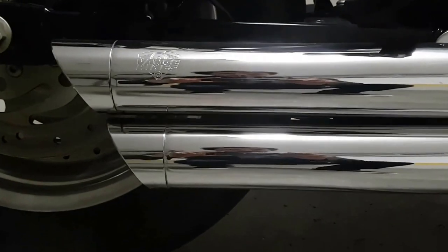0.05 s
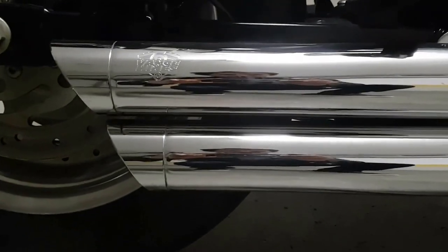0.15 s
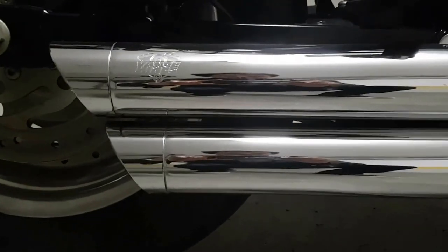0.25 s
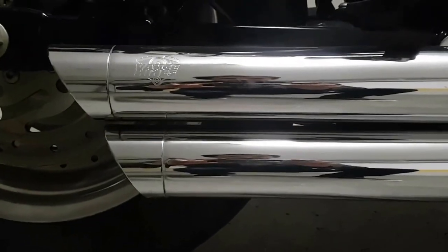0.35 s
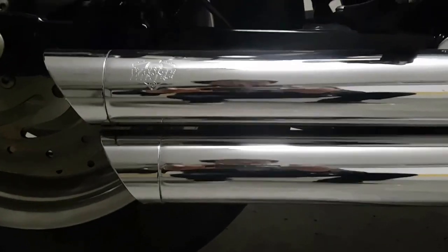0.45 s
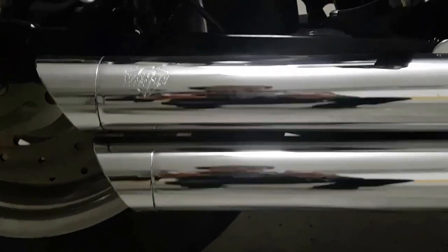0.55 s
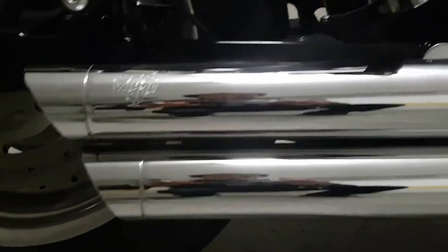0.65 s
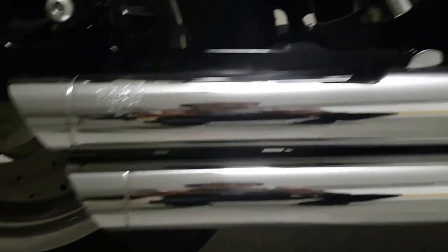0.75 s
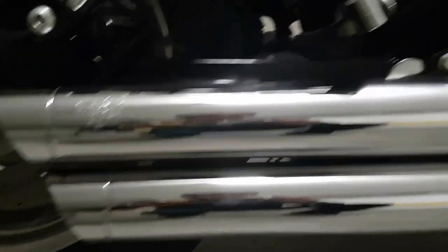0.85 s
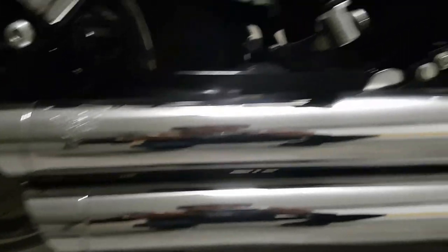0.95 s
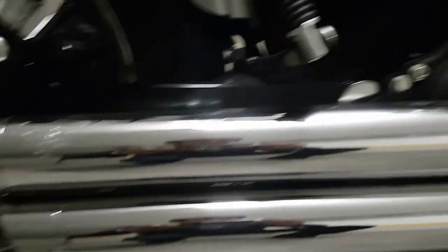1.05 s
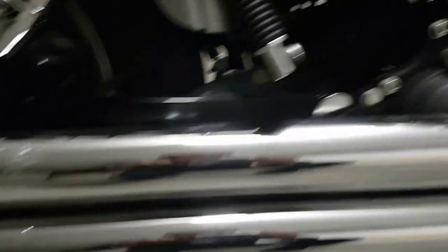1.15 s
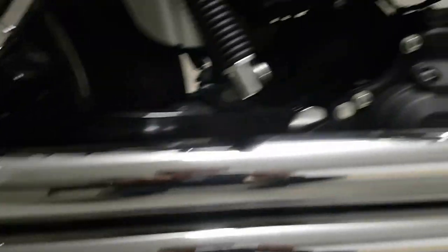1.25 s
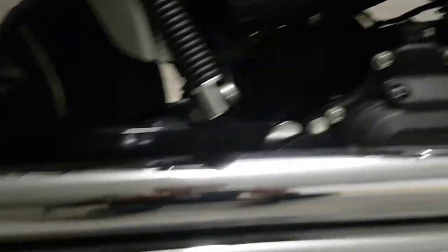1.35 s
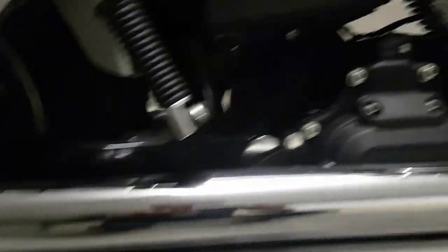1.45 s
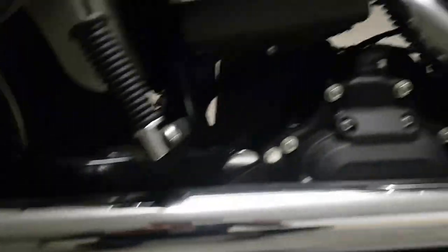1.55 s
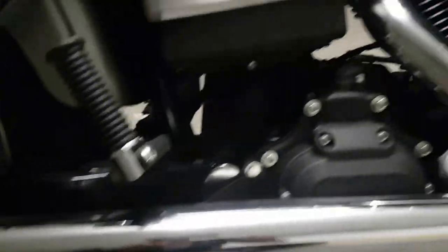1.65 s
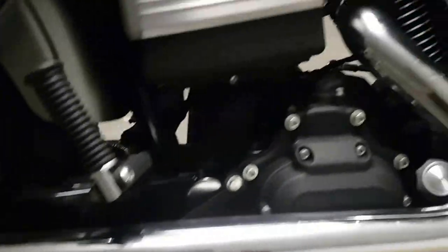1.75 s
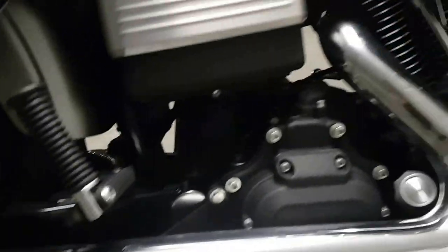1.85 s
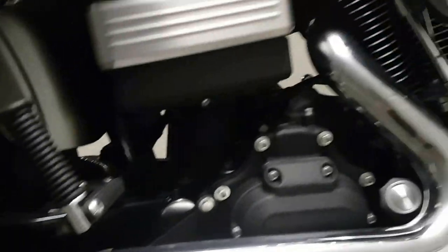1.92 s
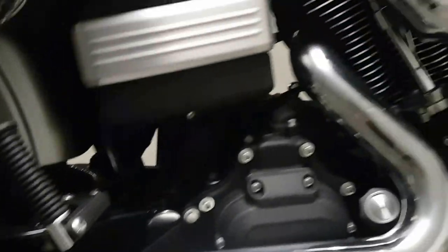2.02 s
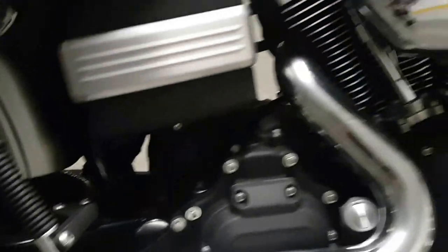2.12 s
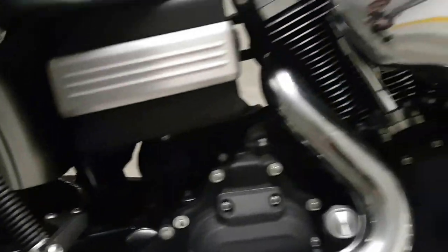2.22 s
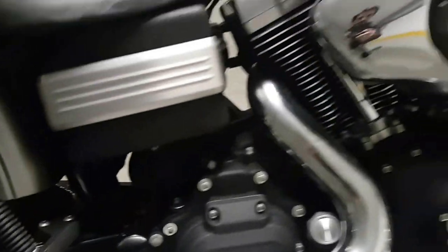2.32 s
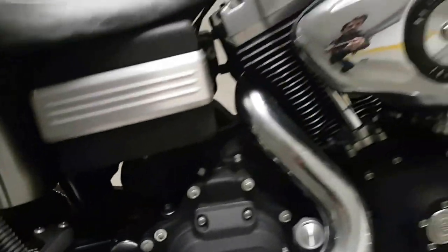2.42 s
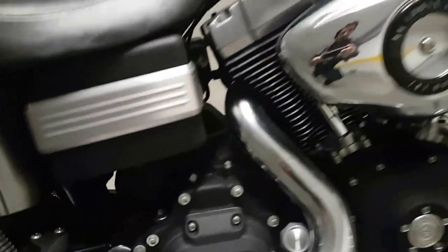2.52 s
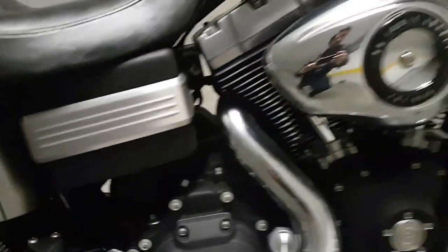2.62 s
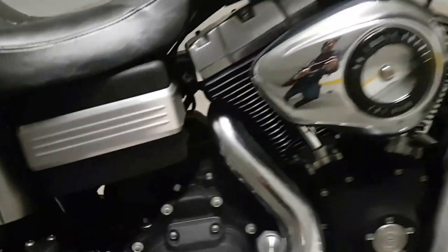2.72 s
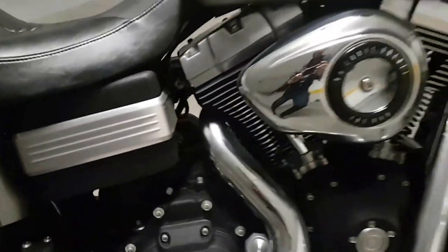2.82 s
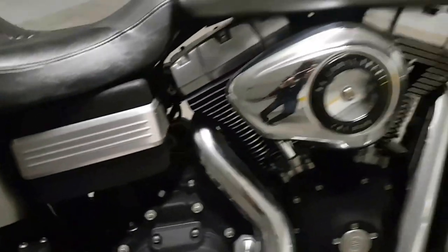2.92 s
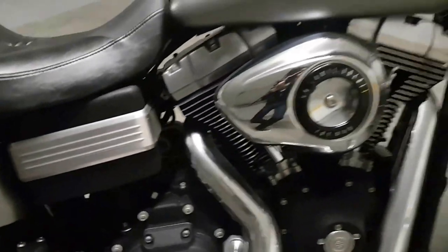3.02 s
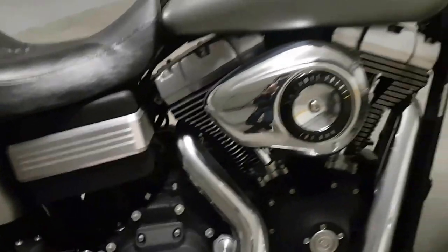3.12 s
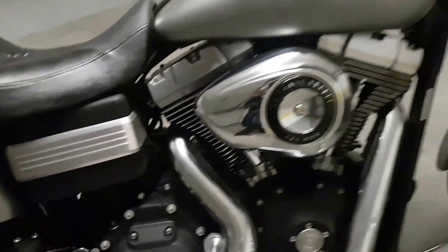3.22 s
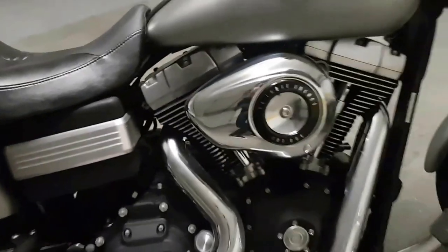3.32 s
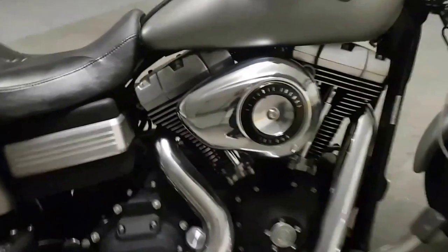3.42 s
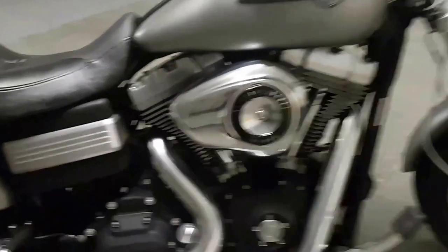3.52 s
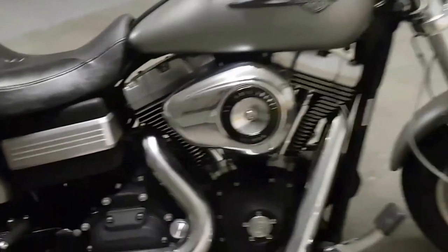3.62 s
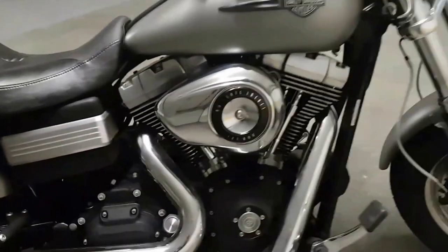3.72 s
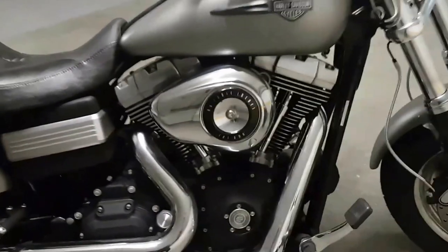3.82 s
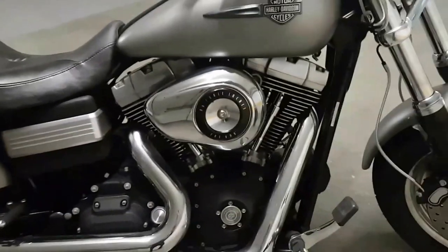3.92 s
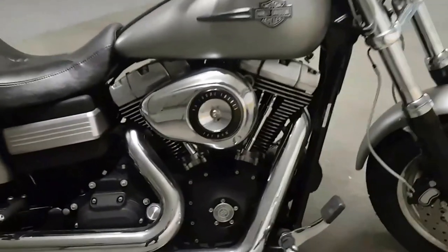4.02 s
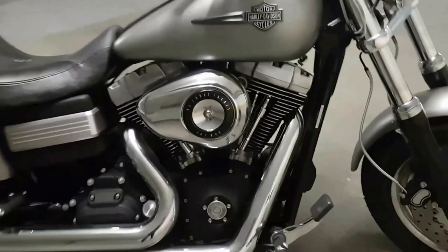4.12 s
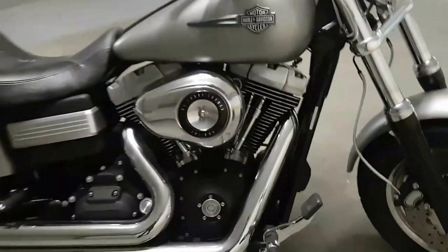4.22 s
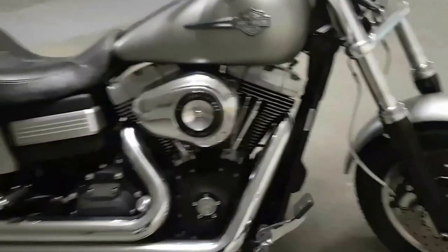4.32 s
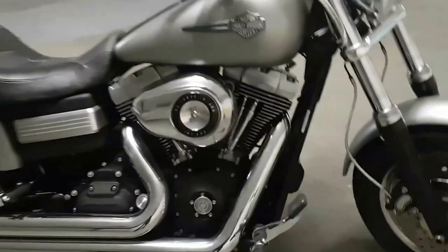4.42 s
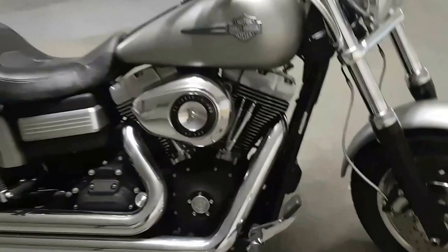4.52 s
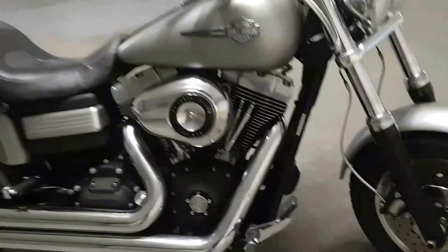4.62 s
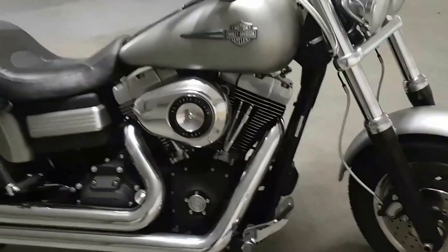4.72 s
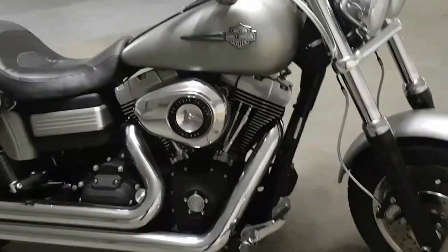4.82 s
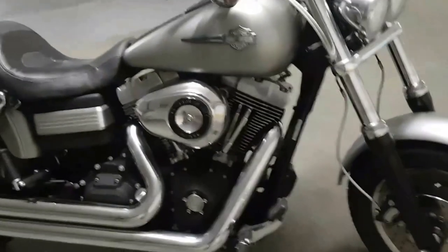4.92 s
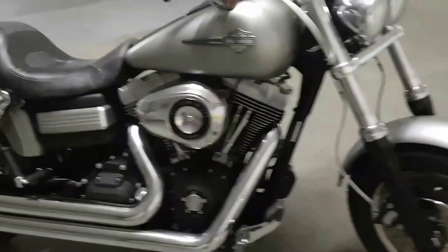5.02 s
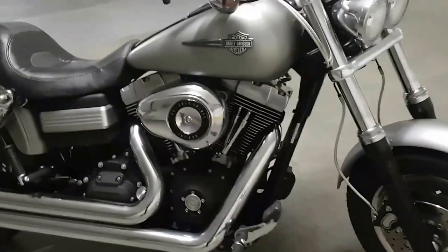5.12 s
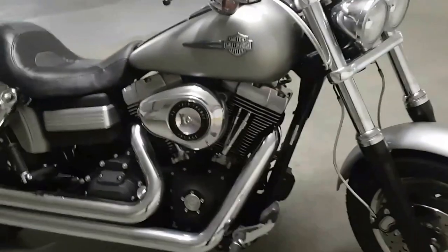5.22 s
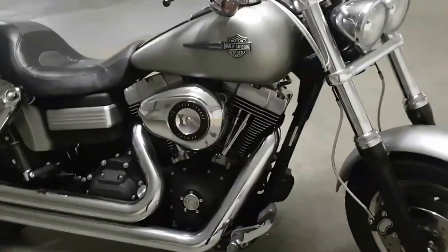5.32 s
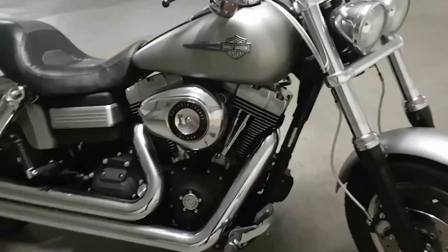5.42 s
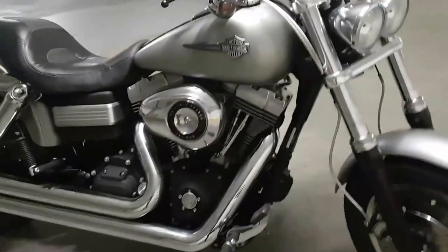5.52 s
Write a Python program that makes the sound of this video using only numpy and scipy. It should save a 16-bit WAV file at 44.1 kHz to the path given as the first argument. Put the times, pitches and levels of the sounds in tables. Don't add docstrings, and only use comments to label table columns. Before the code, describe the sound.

Low loping motorcycle idle throbs and booms in a reverberant garage, with faint mechanical knocks and small handling clicks from the camera.

```python
import sys
import numpy as np
from scipy import signal
from scipy.fft import rfft, irfft
from scipy.io import wavfile
from scipy.ndimage import uniform_filter1d, map_coordinates

SR = 44100
rng = np.random.default_rng(int(sys.argv[2]) if len(sys.argv) > 2 else 0)


def invert_db(level):
    return 10 ** (np.asarray(level, dtype=float) / 20)


def waveform_to_disk(signal):
    frames = np.transpose(np.atleast_2d(signal))
    scaled = np.clip(frames, -1, 1) * 32767
    samples = np.round(scaled).astype(np.int16)
    wavfile.write(sys.argv[1], SR, samples)


N = 244755
HZ = np.fft.rfftfreq(N, 1 / SR)
TIME = np.arange(N) / SR
COARSE = np.arange(0, N + 64, 64) / SR

CYCLES_PER_S, LATENESS, UNEVEN_DB = 8.3, .05, 1
# f/Hz, density/dB
COLOUR = [(13, -42.5), (25, -5), (81, -0.5), (175, -9.5), (252, -13), (332, -18.5), (372, -24), (426, -26),
          (489, -32.5), (704, -39.5), (1360, -47), (2700, -51.5), (5120, -64.5), (7500, -86)]
# f/Hz, width/Hz, level/dB
PIPE_MODES = [(140, 9.8, 1.5), (208, 1.5, 4), (252, 26, 2), (326, 10, 0.5), (686, 160, 5), (1710, 170, 1.5),
              (2050, 150, 3), (2720, 83, 0.5)]
# f/Hz, t60/s
GARAGE_T60 = [(40, 1.45), (250, 1.39), (1000, 3.7), (5000, 3.9)]
# f/Hz, share/1
LIKENESS = [(60, 0.99), (125, 0.98), (250, 0.96), (500, 0.88), (900, 0.25), (2000, 0.018), (6000, 0.058)]
# f/Hz, level/dB
LEAN = [(60, 1.45), (180, 1.3), (300, 1.2), (530, 0.), (4670, .2)]
# t/s, level/dB
WALK = [(0, -42), (.5, -42.5), (1, -42.5), (1.5, -43), (2, -43.5), (2.5, -44.5), (3, -44.5), (3.5, -45),
        (4, -46), (4.5, -45.5), (5, -47.5), (5.3, -47), (5.55, -46.5)]
START_DB = -42.5
# level/dB, ratio/1
LOW_BED, BOOM_BED, GROWL_BED, RASP_BED = (-35.5, 0.93), (-24, 1.97), (-30, 1.95), (-35.5, 0.76)
ABREAST_S, ABREAST_SPAN_S, ABREAST_RASP_DB, ABREAST_CLATTER_DB, CLATTER_DB = 3.28, 1.55, 2.5, 2, -10.5
# t/s, level/dB, length/s
HEAVES = [(0.289, -35.5, 0.36), (0.449, -29.5, 0.081), (0.688, -34, 0.224), (0.963, -32, 0.097),
          (2.29, -31, 0.53), (2.859, -40, 0.35), (3.013, -30, 0.18), (3.367, -37, 0.056),
          (3.722, -36.5, 0.279), (3.936, -34, 0.08), (4.086, -34, 0.11), (4.53, -28, 0.066),
          (4.689, -44, 0.48), (4.799, -52, 1.3), (5.163, -48, 0.085), (5.343, -50, 0.16)]
# t/s, level/dB, length/s, f/Hz
BOOMS = [(0.121, -17.5, 0.04, 76), (0.295, -18.5, 0.096, 75.7), (0.497, -30.5, 0.05, 77.7),
         (0.624, -17.5, 0.039, 82.5), (0.77, -21.5, 0.05, 78.6), (0.854, -21, .03, 83.6),
         (0.969, -24, 0.017, 72.1), (1.036, -22.5, 0.059, 72.2), (1.137, -16, 0.049, 71.3),
         (1.23, -28.5, 0.047, 68.5), (1.624, -17.5, 0.072, 82.2), (1.836, -30, 0.086, 84),
         (2.091, -23, 0.053, 75.4), (2.219, -27.5, .05, 84.1), (2.411, -24, 0.076, 85.3),
         (2.685, -26, 0.06, 81.7), (2.755, -25, 0.029, 76.6), (2.859, -26, 0.057, 71.2),
         (3.11, -27, 0.32, 76.3), (3.238, -25, 0.059, 75.3), (3.482, -30.5, 0.28, 85.9),
         (3.768, -22.5, 0.034, 77.1), (4.078, -26, 0.2, 85), (4.14, -34, 0.2, 75.6),
         (4.321, -36, 0.027, 74.3), (4.392, -25, 0.056, 72.7), (4.56, -34, 0.061, 74.2),
         (4.652, -32.5, 0.16, 72.8), (4.895, -30.5, 0.091, 70.8), (5.006, -32, 0.083, 80.3),
         (5.152, -31, 0.066, 79.3), (5.213, -24, 0.021, 72.3), (5.309, -25, 0.05, 80.6),
         (5.471, -29, 0.042, 78.3)]
# t/s, depth/dB
LULLS = [(0.166, 16), (0.392, 1), (0.454, 8.5), (0.574, 12), (0.667, 13), (0.703, 10.5), (0.823, 5.5),
         (0.887, 8), (1.068, 7), (1.184, 13), (1.356, 12), (1.537, 9), (1.73, 3), (1.796, 6), (1.971, 7),
         (2.036, 2), (2.154, 6), (2.283, 3), (2.322, 5.5), (2.452, 0), (2.537, 7), (2.578, 3), (2.717, 8),
         (2.823, 11), (2.932, 5.5), (2.971, 2), (3.027, 4), (3.189, 12), (3.322, 10), (3.456, 5),
         (3.544, 7), (3.59, 6), (3.639, 10), (3.707, 5), (3.859, 12), (3.932, 10), (4.177, 4), (4.231, 8),
         (4.293, 7), (4.347, 2), (4.474, 8), (4.601, 3), (4.78, 11), (4.841, 22), (4.968, 4), (5.118, 14),
         (5.279, 10), (5.349, 2), (5.451, 8), (5.512, 6)]
LULL_S, GROWL_LULL_S, WAVER = 0.014, 0.0074, .05
# t/s, level/dB, length/s
GROWLS = [(0.244, -31, 0.014), (0.489, -18, 0.015), (0.569, -32, 0.18), (0.723, -26, 0.072),
          (0.788, -27.5, 0.045), (0.843, -26, 0.086), (1.287, -33, 0.11), (1.452, -33, 0.11),
          (1.676, -30.5, 0.094), (1.811, -28, 0.067), (1.896, -28.5, 0.05), (2.05, -28, 0.14),
          (2.13, -31, 0.083), (2.28, -23.5, 0.041), (2.395, -28.5, 0.035), (2.499, -26.5, 0.042),
          (2.639, -28, 0.062), (2.968, -30, 0.049), (3.143, -27.5, 0.035), (3.342, -32.5, 0.15),
          (3.487, -31, 0.031), (3.697, -31.5, 0.15), (3.901, -28.5, 0.028), (4.011, -36.5, 0.14),
          (4.25, -31.5, 0.14), (4.58, -35, 0.084), (4.684, -32, 0.083), (4.899, -33, 0.21),
          (5.128, -30.5, 0.023), (5.468, -31, 0.057)]
# t/s, depth/dB
GROWL_LULLS = [(0.093, 19), (0.215, 11), (0.286, 15), (0.372, 6), (0.422, 11.5), (0.687, 6), (0.941, 8),
               (0.984, 8), (1.107, 13), (1.206, 0), (1.263, 7), (1.494, 8), (1.546, 8), (1.78, 17),
               (1.853, 3), (2.02, 19), (2.177, 9), (2.311, 9), (2.433, 10), (2.537, 7), (2.728, 9),
               (2.88, 13), (3.023, 11), (3.109, 16), (3.2, 13), (3.234, 3.5), (3.376, 7), (3.46, 11),
               (3.512, 9), (3.619, 4), (3.664, 4), (3.812, 15), (3.991, 0), (4.043, 22), (4.093, 10),
               (4.231, 16), (4.345, 6), (4.488, 8), (4.556, 6), (4.644, 16), (4.771, 8), (4.823, 6),
               (4.955, 9), (5.0, 6), (5.088, 8), (5.238, 11), (5.361, 19), (5.39, 6), (5.42, 7),
               (5.517, 12)]
# t/s, level/dB, length/s, f/Hz
RASPS = [(0.079, -35.5, 0.047, 237), (0.258, -36, 0.062, 203), (0.508, -39.5, 0.26, 287),
         (0.786, -32, 0.082, 257.4), (1.138, -34, 0.028, 284), (1.213, -36, 0.044, 208),
         (1.341, -36, 0.2, 259), (1.983, -32, 0.046, 288), (2.205, -32, 0.17, 245.6),
         (2.412, -32.5, 0.054, 218), (2.521, -30, 0.072, 221.7), (2.65, -40.5, 0.084, 205.4),
         (2.747, -33, 0.17, 252), (3.022, -30.5, 0.096, 225), (3.233, -31.5, 0.17, 205),
         (3.393, -34.5, 0.058, 266), (3.612, -34, 0.078, 225), (3.861, -33.5, 0.03, 224),
         (4.052, -30.5, 0.03, 260), (4.184, -38.5, 0.096, 236.7), (4.957, -58, 0.19, 264.4),
         (5.321, -34.5, 0.056, 266), (5.498, -34, 0.04, 216)]
# t/s, level/dB, length/s
TAILPIPE = [(.95, -41.5, .5), (3.9, -46.5, 1)]
TAILPIPE_HZ = 329.5
# t/s, lead/ms
FACING = [(0, 0), (.75, .2), (1.25, .2), (1.75, -.05), (3.75, 0), (4.25, .26), (5.55, .3)]
# t/s, length/s, f/Hz, level/dB
FIN_RINGS = [(2.4, 1.0, 1750, -67), (3.3, .95, 1680, -63.5), (3.4, .75, 1500, -65), (2.2, .6, 2150, -64),
             (2.2, .5, 2720, -69), (2.65, .3, 1500, -65), (0., .6, 1520, -64), (5.1, .42, 1080, -63),
             (5.12, .4, 760, -59), (.7, .8, 1480, -66), (.3, 1.2, 2900, -71), (2.45, .45, 1950, -65),
             (3.65, .45, 2100, -68)]
# f/Hz, density/dB
HISS = [(4500, -16), (6500, 1.5), (7800, 0), (9800, 0), (11500, 2), (13000, 2), (14500, 4), (15300, 3),
        (15800, 4)]
HISS_DB, HISS_RISE_DB_PER_S, WHIR_DB, WHIR_LIFTS_HISS_DB = -70.5, 0.31, -93.5, 8.5
# t/s, level/dB, length/s
WHIRS = [
    (0.02, -77.5, 0.14),
    (.15, -87, 0.18),
    (1.4, -91, 0.41),
    (2.85, -77, 0.084),
    (2.95, -80, .12),
    (3.55, -90, .1),
    (3.85, -85, 0.39),
    (4.75, -80.5, 0.31),
]
# t/s, level/dB, f/Hz, width/Hz, length/s
TICKS = [(0.106, -65, 14800, 2500, 0.0054), (0.757, -56.5, 12140, 6000, 0.0061),
         (1.106, -54.5, 13560, 6000, 0.0054), (1.966, -51.5, 8740, 8850, .004),
         (2.3193, -44.5, 12700, 5000, 0.006), (2.32, -43.5, 4500, 3490, 0.0053),
         (2.3207, -48, 9060, 2500, 0.005), (2.324, -53, 11000, 8000, 0.0072),
         (2.7, -38.5, 1000, 1000, 0.012), (4.314, -35, 890, 500, 0.02), (1.962, -54, 4800, 2500, .005),
         (4.3283, -51, 11800, 400, .025), (4.332, -64.5, 12400, 800, .015), (4.541, -65, 10650, 2000, .02),
         (4.6763, -52.5, 15260, 1183, 0.011), (4.6725, -51, 4400, 450, .016),
         (4.6725, -54, 5200, 450, .014), (4.45, -62.5, 9300, 7000, .004), (4.34, -59.5, 5300, 600, .012)]
# t/s, level/dB
TAPS = [(0.147, -47.5), (0.642, -49.5), (1.012, -50.5), (1.374, -50), (2.391, -51), (2.4162, -47),
        (2.575, -38), (2.676, -47.5), (2.811, -45.5), (3.33, -48), (3.9414, -46), (4.5065, -57),
        (5.169, -53)]
TAP_HZ, TAP_WIDTH_HZ, TAP_S = 1650, 740, 0.016
# t/s, length/s, start f/Hz, end f/Hz, level/dB
SQUEAKS = [(1.24, .055, 11400, 11850, -79), (1.245, .022, 10550, 10700, -78),
           (1.317, .022, 9250, 9000, -73), (1.32, .1, 10000, 9500, -81), (1.378, .04, 12000, 11650, -76),
           (1.412, .02, 11600, 11400, -72), (1.45, .022, 9350, 9200, -76), (1.213, .015, 11750, 11800, -78),
           (1.295, .02, 10750, 10900, -79), (1.39, .015, 11050, 11000, -79), (1.49, .035, 8700, 8400, -80),
           (3.665, .035, 11900, 12600, -76), (3.705, .025, 13100, 11900, -77),
           (3.74, .022, 12800, 12200, -77), (3.745, .012, 11300, 11200, -74),
           (3.7, .018, 10200, 10000, -78), (3.81, .02, 8750, 8800, -73), (3.645, .04, 10900, 11550, -71),
           (3.675, .028, 11550, 11620, -68), (3.72, .024, 11700, 10850, -68),
           (4.345, .037, 11900, 11850, -74), (4.673, .032, 11900, 11900, -73)]


def evened(x):
    return x / np.sqrt(np.mean(x ** 2) + 1e-20)


def read(points, hz):
    f, value = np.transpose(points)
    return np.interp(np.log(hz + 1), np.log(f + 1), value)


def curves(rows):
    s, *columns = np.transpose(rows)
    return [np.interp(TIME, s, c) for c in columns]


def shaped(x, gain):
    return irfft(rfft(x) * gain, N)


def resonate(x, hz, width_hz):
    turn = np.exp(2j * np.pi * np.cumsum(hz * np.ones(x.shape[-1])) / SR)
    r = np.exp(-np.pi * width_hz / SR)
    return 2 * (turn * signal.lfilter([1 - r], [1, -r], x / turn)).real


def steadied(x, span_s):
    span = round(span_s * SR)
    power = uniform_filter1d(uniform_filter1d((x ** 2).mean(0), span), span)
    return evened(x / np.sqrt(abs(power) + 0.013 * power.mean()))


def swells(rows, bed_db):
    power = 0
    for s, db, length_s, *_ in rows:
        bell_db = db - 16 * ((COARSE - s) / max(length_s, .01)) ** 2
        power = power + invert_db(2 * np.maximum(bell_db, -200))
    return np.sqrt(invert_db(2 * bed_db) + np.interp(TIME, COARSE, power))


def dips(rows, length_s):
    depth_db = sum(db * np.exp(-((COARSE - s) / length_s) ** 2) for s, db in rows)
    return np.interp(TIME, COARSE, invert_db(-depth_db))


def first_blow():
    return invert_db(-16.5) * np.cos(2 * np.pi * 55 * TIME - .5) * invert_db(-500 * TIME)


def firings():
    late, size = rng.standard_normal((2, 140))
    gaps_s = np.tile([315, 405], 70) / 720 / CYCLES_PER_S * (1 + LATENESS * late)
    blows = np.zeros(N + SR)
    at = (np.cumsum(gaps_s) * SR).astype(int)
    inside = at < len(blows)
    blows[at[inside]] = invert_db(UNEVEN_DB * size)[inside]
    pressure = signal.lfilter([1], [1, -np.exp(-1 / (0.046 * SR))], blows)
    puff = pressure * rng.standard_normal(len(blows))
    flow = rng.standard_normal(len(blows))
    return evened(blows) + 0.67 * evened(puff) + 0.82 * flow


def garage(x):
    hop = SR // 2
    count = len(x) // hop + 1
    hz, t, z = signal.stft(rng.standard_normal((count, 2, SR)), SR, nperseg=1024)
    decay = invert_db(-60 * t / read(GARAGE_T60, hz)[:, None])
    tails = signal.istft(z * decay, SR, nperseg=1024)[1][..., :SR]
    tails /= np.linalg.norm(tails[0, 0])
    tails[:, 0, 0] += .07
    x = np.pad(x, (hop, 2 * hop))
    wet = np.zeros((2, len(x) + 3 * SR))
    fade = np.sin(np.pi * np.arange(SR) / SR)
    for k, tail in enumerate(tails):
        piece = x[k * hop:k * hop + SR] * fade
        wet[:, k * hop:k * hop + 2 * SR - 1] += signal.fftconvolve(piece[None], tail, axes=1)
    shared, apart = rfft(wet[:, SR + hop:SR + hop + N])
    same = np.clip(read(LIKENESS, HZ), 0, 1)
    shared, apart = shared * np.sqrt(1 + same), apart * np.sqrt(1 - same)
    lean = invert_db(-read(LEAN, HZ) / 2)
    return irfft([(shared + apart) * lean, (shared - apart) / lean], N)


def standing_wave(hz):
    jumps = rng.choice([-1, 1], len(LULLS)) * rng.uniform(1.6, 3.1, len(LULLS))
    slip = sum(jump * np.tanh((COARSE - s) / .008) / 2 for jump, (s, _) in zip(jumps, LULLS))
    waver = evened(uniform_filter1d(uniform_filter1d(rng.standard_normal(N), 1500), 1500))
    turn = 2 * np.pi * np.cumsum(hz * (1 + WAVER * waver)) / SR + np.interp(TIME, COARSE, slip)
    return np.sqrt(2) * np.cos(turn) * invert_db(np.array([[-.7], [.7]]))


def room_boom(low, boom, low_db, boom_db):
    low = steadied(resonate(low, 40.5, 22), .25) + 0.25 * evened(resonate(low, 40.5, 6.1))
    boom = steadied(boom, .12) + 1.3 * standing_wave(curves(BOOMS)[-1])
    heaving = swells(HEAVES, low_db) * steadied(low, 0.045)
    return heaving + swells(BOOMS, boom_db) * dips(LULLS, LULL_S) * steadied(boom, 0.031)


def pipes(growl, rasp, growl_db, rasp_db):
    tube = swells(TAILPIPE, -61) * steadied(resonate(rasp, TAILPIPE_HZ, 30), 0.16)
    rasp = steadied(rasp, 0.2) + 0.8 * steadied(resonate(rasp, curves(RASPS)[-1], 36), 0.1)
    growl = steadied(growl, 0.19) + 0.45 * steadied(resonate(growl, 129.5, 24), 0.12)
    growl_gain = swells(GROWLS, growl_db) * dips(GROWL_LULLS, GROWL_LULL_S)
    return growl_gain * steadied(growl, 0.03) + swells(RASPS, rasp_db) * steadied(rasp, 0.18) + tube


def engine():
    colour_db = read(COLOUR, HZ)
    for hz, width_hz, db in PIPE_MODES:
        colour_db = colour_db + db / (1 + (2 * (HZ - hz) / width_hz) ** 2)
    sound = shaped(garage(firings()), invert_db(colour_db))
    above = [1] + [1 / (1 + (hz / (HZ + 1)) ** 12) for hz in (52, 105, 190, 380, 1200)] + [0]
    low, boom, growl, rasp, roar, clatter = (shaped(sound, a - b) for a, b in zip(above, above[1:]))
    roar_db = curves(WALK)[-1]
    beds = (LOW_BED, BOOM_BED, GROWL_BED, RASP_BED)
    low_db, boom_db, growl_db, rasp_db = (db + ratio * (roar_db - START_DB) for db, ratio in beds)
    abreast = np.exp(-((TIME - ABREAST_S) / ABREAST_SPAN_S) ** 2)
    rasp_db = rasp_db + ABREAST_RASP_DB * abreast
    clatter_db = CLATTER_DB + ABREAST_CLATTER_DB * abreast
    cylinders = invert_db(roar_db) * (steadied(roar, 0.32) + invert_db(clatter_db) * steadied(clatter, 0.12))
    return room_boom(low, boom, low_db, boom_db) + pipes(growl, rasp, growl_db, rasp_db) + cylinders


def facing(ports):
    lead_s = curves(FACING)[0] / 2000
    return np.array([map_coordinates(x, [(TIME + d) * SR], order=3, mode="nearest")
                     for x, d in zip(ports, (lead_s, -lead_s))])


def fins():
    out = np.zeros((2, N))
    for s, length_s, hz, db in FIN_RINGS:
        n = round(length_s * SR)
        ring = resonate(resonate(rng.standard_normal((2, 2 * SR)), hz, 38), hz, 38)[:, :n]
        out[:, round(s * SR):][:, :n] += invert_db(db) * evened(ring) * signal.windows.tukey(n, .6)
    return out


def hiss_and_whir():
    whir = swells(WHIRS, WHIR_DB)
    hiss_gain = np.hypot(invert_db(HISS_DB + HISS_RISE_DB_PER_S * TIME), invert_db(WHIR_LIFTS_HISS_DB) * whir)
    a, b, c = rng.standard_normal((3, N))
    ports = np.array([a + 0.05 * c, b + .05 * c])
    hiss = evened(shaped(ports, invert_db(read(HISS, HZ)) * (HZ > 4500)))
    return hiss_gain * hiss + whir * evened(resonate(resonate(hiss, 8840, 1000), 8840, 1000))


def knocks(rows):
    out = np.zeros((2, N))
    t = np.arange(2000) / SR
    for s, db, hz, width_hz, length_s in rows:
        snap = 0.22 * rng.standard_normal(2000) + rng.standard_normal((2, 2000))
        tick = resonate(resonate(snap, hz, width_hz), hz, width_hz) * invert_db(-30 * t / max(length_s, 1e-3))
        out[:, round(s * SR):][:, :2000] += invert_db(db) * tick / abs(tick).max()
    return out


def handling_ticks():
    return knocks(TICKS)


def valve_taps():
    return knocks([(s, db, TAP_HZ, TAP_WIDTH_HZ, TAP_S) for s, db in TAPS])


def strap_squeaks():
    out = np.zeros((2, N))
    for s, length_s, start_hz, end_hz, db in SQUEAKS:
        n = round(length_s * SR)
        flutter = 1 + .25 * evened(uniform_filter1d(rng.standard_normal(n), 150))
        turns = np.cumsum(np.linspace(start_hz, end_hz, n)) / SR + [[0], [.2]]
        squeak = np.sin(2 * np.pi * turns) * flutter * signal.windows.tukey(n, .6)
        out[:, round(s * SR):][:, :n] += invert_db(db) * squeak
    return out


def scene():
    running = facing(engine()) * (1 - invert_db(-900 * TIME))
    camera = hiss_and_whir() + handling_ticks() + strap_squeaks()
    return first_blow() + running + fins() + camera + valve_taps()


def low_pass(x):
    return signal.sosfilt(signal.butter(12, 15760, fs=SR, output="sos"), x)


def record(dry):
    closing = np.minimum((N - np.arange(N)) / (.004 * SR), 1)
    return low_pass(dry * closing)


dry = scene()
out = record(dry)
waveform_to_disk(out)
```